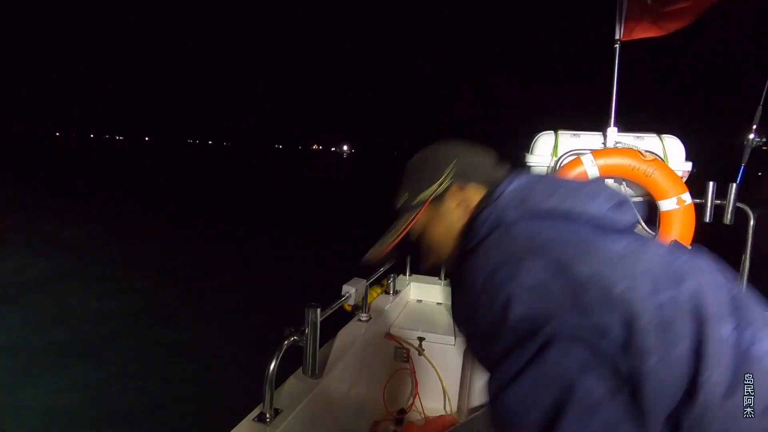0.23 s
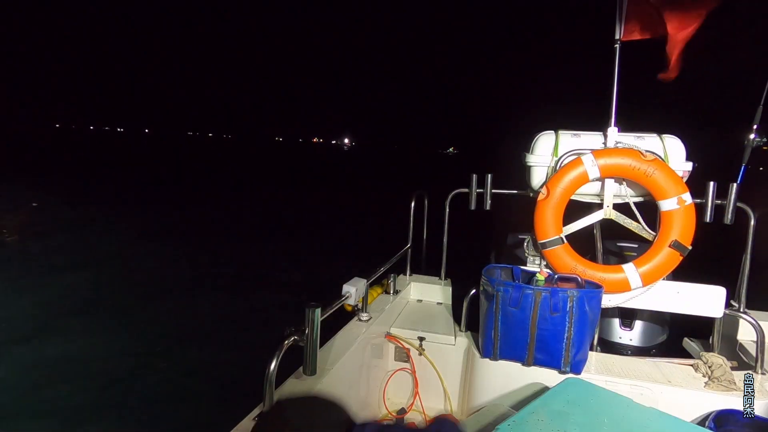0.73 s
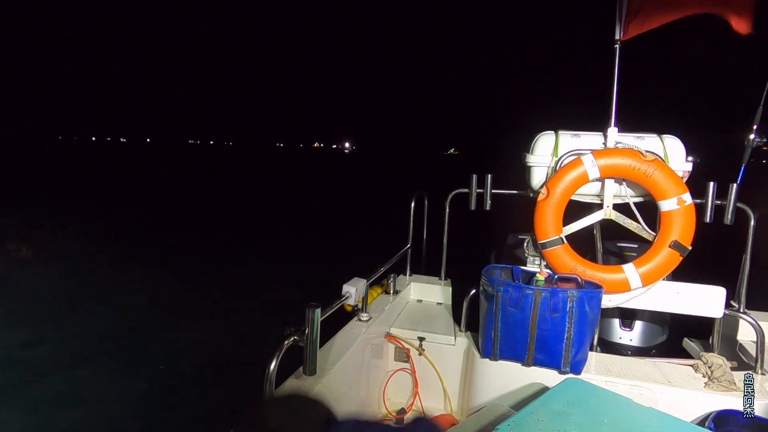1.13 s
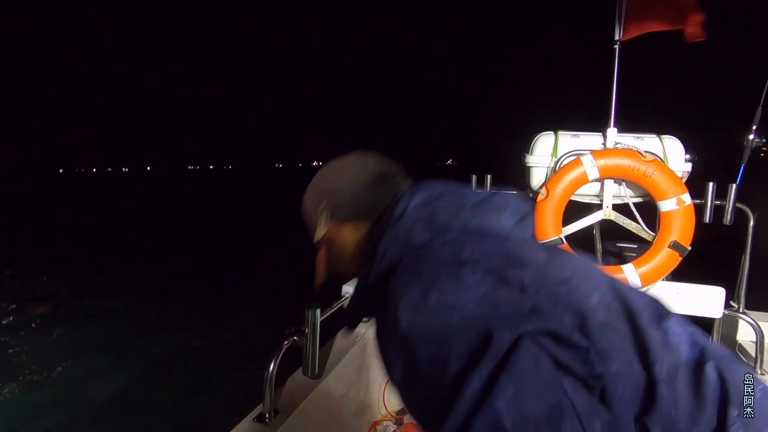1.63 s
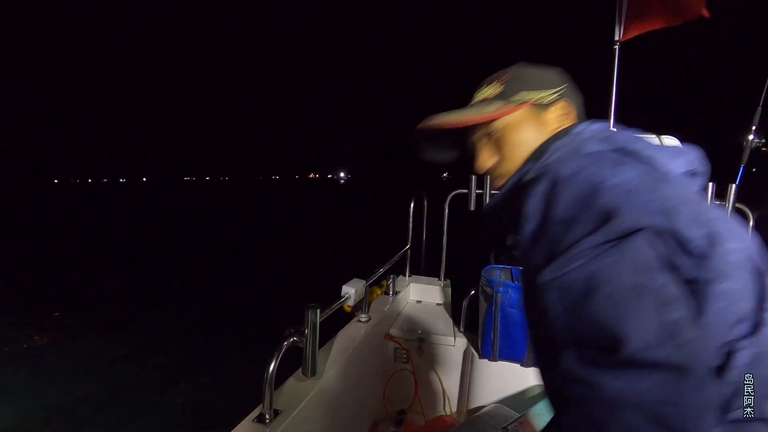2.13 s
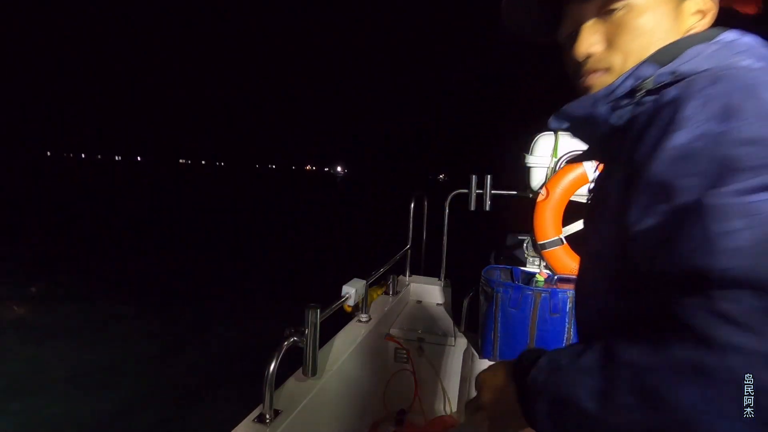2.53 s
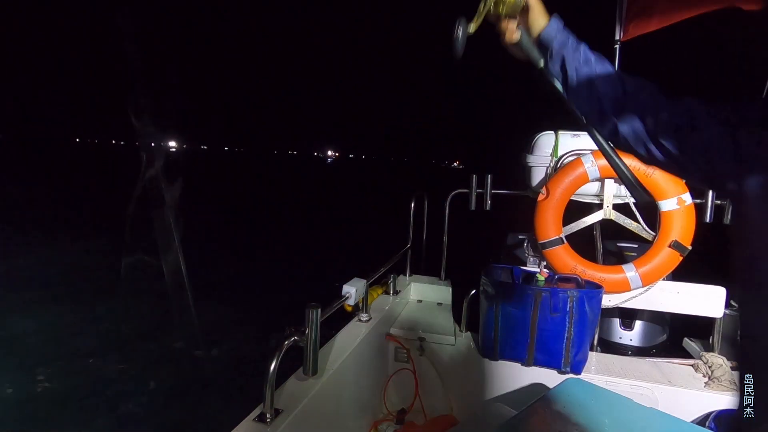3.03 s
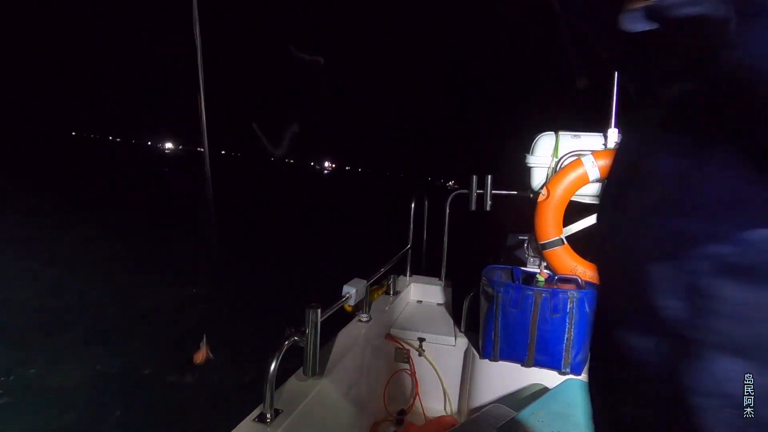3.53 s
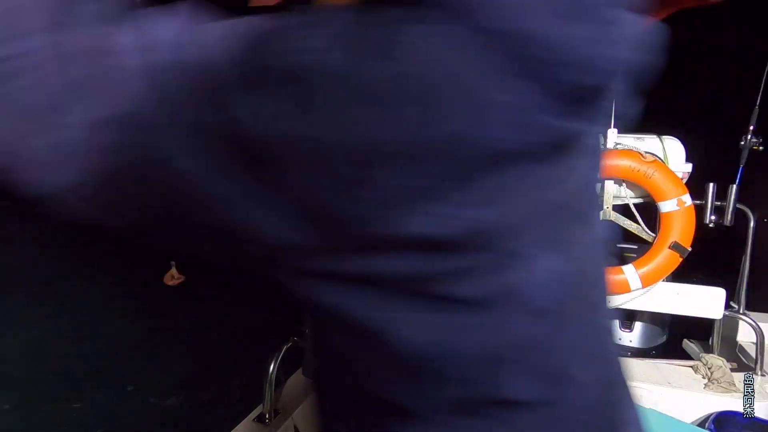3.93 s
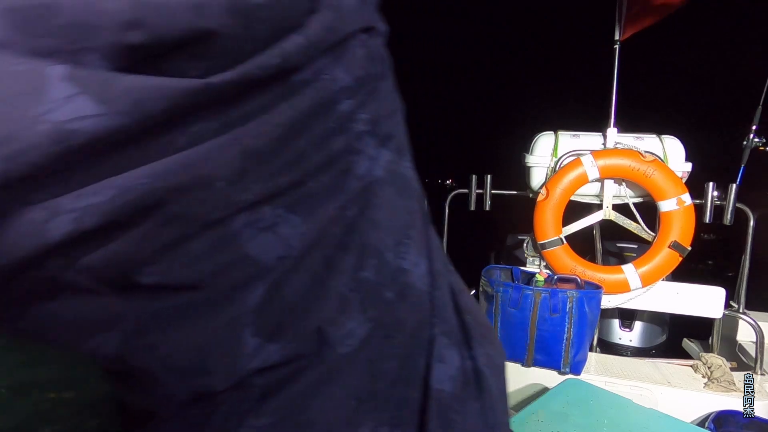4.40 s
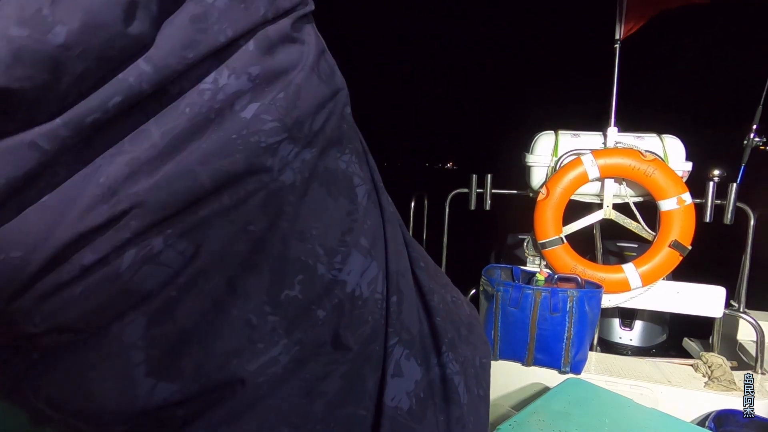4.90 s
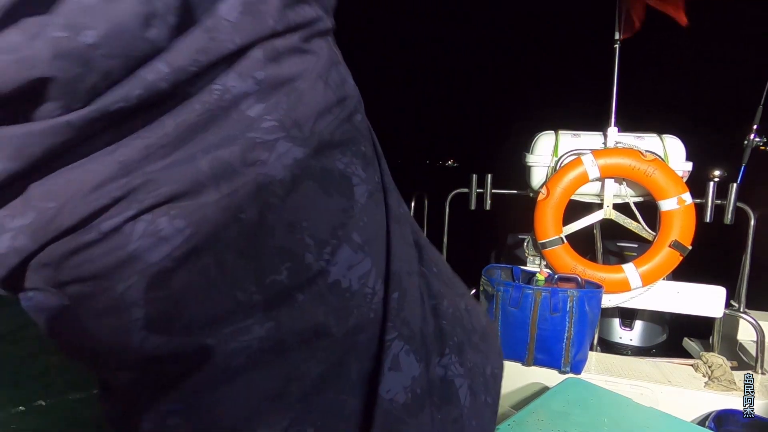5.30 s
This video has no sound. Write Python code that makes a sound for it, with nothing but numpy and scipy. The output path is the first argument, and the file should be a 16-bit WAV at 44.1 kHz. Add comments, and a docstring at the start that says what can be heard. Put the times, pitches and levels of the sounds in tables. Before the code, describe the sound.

Night aboard a small boat: low wind rumble and idling engine, gear clattering on the deck, one violent crack with a boom, then knocks and taps.

```python
"""A small fishing boat at night: wind rumbles on the microphone over an idling engine and the wash of the sea.
An angler's gear clatters on the hollow deck; one hard blow sets the hull booming; sharp knocks, light taps
and the chirr of a reel follow. Impacts are noise bursts and decaying modes shaped by resonant bodies;
wind, water and cloth are shaped noise, the engine a sum of unsteady sines. Gain control ducks loud moments."""
import sys
import numpy as np
from scipy import signal
from scipy.fft import rfft, irfft, next_fast_len
from scipy.io import wavfile
from scipy.ndimage import uniform_filter1d, map_coordinates

SR = 44100
rng = np.random.default_rng(int(sys.argv[2]) if len(sys.argv) > 2 else 0)


def to_wav(s):
    """Save 16-bit WAV."""
    ch = np.atleast_2d(s).T  # columns
    pcm = np.round(np.clip(ch, -1, 1) * 32767)  # PCM
    wavfile.write(sys.argv[1], SR, pcm.astype(np.int16))


N = 244970
TIME = np.arange(N) / SR
HIT = np.arange(16384) / SR  # time within one hit, s
HIT_HZ = np.fft.rfftfreq(len(HIT), 1 / SR)

# Stereo balance: freq_hz, left_minus_right_db
LEFT_BALANCE = [(30, 1), (100, -0.4), (400, 0.6), (1300, 2), (2400, 3.5), (4400, 2), (12000, -1.5)]
# Resonances of the gear: freq_hz, width_hz, prominence (4 units per dB)
GEAR_MODES = [(1110, 200, -6.5), (1850, 270, 2), (2850, 130, 10.5), (3730, 60, -6.5), (4310, 210, -3.5),
              (4900, 140, -5), (7300, 300, -4)]


def amp(db):
    """Decibels to gain."""
    return 10 ** (np.asarray(db) / 20)


def unit(x):
    """x at rms 1."""
    return x / np.sqrt(np.mean(x ** 2) + 1e-20)


def norm(x):
    """x at mean energy 1 per channel."""
    return unit(x) / np.sqrt(x.shape[-1])


def fade(t60_s):
    """Exponential decay over one hit, 60 dB in t60_s."""
    return np.exp(-np.log(1000) * HIT / max(t60_s, 1e-3))


def swell(middle_s, half_s):
    """Bell-shaped rise and fall; 1/e at half_s from the middle."""
    return np.exp(-((TIME - middle_s) / half_s) ** 2)


def along(points, hz):
    """Interpolate (freq_hz, value) points on a log frequency axis."""
    freq_hz, value = np.transpose(points)
    return np.interp(np.log(hz + 1), np.log(freq_hz + 1), value)


def wobble(rate_hz):
    """Smooth random curve with rate_hz knots a second."""
    knots = rng.standard_normal(int(N * rate_hz / SR) + 4)
    return map_coordinates(knots, [TIME * rate_hz])


def filtered(x, response):
    """Multiply the spectrum of x by a response of frequency."""
    size = next_fast_len(N + SR // 2)
    return irfft(rfft(x, size) * response(np.fft.rfftfreq(size, 1 / SR)), size)[..., :N]


def lowpass(x, order, edge_hz):
    """Butterworth low-pass."""
    return signal.sosfilt(signal.butter(order, edge_hz, fs=SR, output="sos"), x)


def add(track, start_s, sound):
    """Mix a sound into a track."""
    part = track[:, round(start_s * SR):][:, :sound.shape[-1]]
    part += sound[..., :part.shape[1]]


def rush(spectrum, patchy_db):
    """Shaped stereo noise, rms 1, with patches of random gain; channel likeness depends on frequency."""
    # Channel correlation: freq_hz, correlation
    likeness = [(25, .6), (45, .85), (70, .95), (130, .99), (280, .97), (640, .72), (1400, .6), (3000, .3),
                (7000, -.1)]
    cells = signal.stft(rng.standard_normal((2, N)), nperseg=512)[2]
    field = rng.standard_normal(cells.shape[1:])
    field = uniform_filter1d(field, size=6, axis=0)
    field = uniform_filter1d(field, size=12, axis=1)
    pair = signal.istft(cells * amp(patchy_db * unit(field)), nperseg=512)[1][:, :N]

    def mid_side(hz):
        turn = np.arccos(np.clip(along(likeness, hz), -1, 1)) / 2
        return amp(along(spectrum, hz)) * [np.cos(turn), np.sin(turn)]

    mid, side = filtered(pair, mid_side)
    balance = lambda hz: amp(np.outer([.5, -.5], along(LEFT_BALANCE, hz)))
    return unit(filtered([mid + side, mid - side], balance))


def pops(spectrum, per_s, spread_db):
    """Sparse shaped stereo pops of uneven size and random place, rms 1."""
    size = amp(spread_db * np.clip(rng.standard_normal(N), -2, 2))
    clicks = (rng.random(N) < per_s / SR) * size * rng.choice([-1, 1], N)
    place = rng.uniform(0, np.pi / 2, N)
    stereo = clicks * [np.cos(place), np.sin(place)]
    balance_db = lambda hz: np.outer([.5, -.5], along(LEFT_BALANCE, hz))
    return unit(filtered(stereo, lambda hz: amp(along(spectrum, hz) + balance_db(hz))))


def through(x, tone, modes=(), lift_db=0):
    """Pass x through a minimum-phase body: a broad tone with resonances standing out of it."""
    db = along(tone, HIT_HZ)
    for hz, width_hz, prominence in modes:
        peak = amp(lift_db + prominence / 4) / (1 + (2 * (HIT_HZ - hz) / width_hz) ** 2)
        db = db + 20 * np.log10(1 + peak)
    # folding the cepstrum makes the response causal
    cepstrum = irfft(np.log(amp(db)))
    cepstrum[1:len(HIT) // 2] *= 2
    cepstrum[len(HIT) // 2:] = 0
    return irfft(rfft(x) * np.exp(rfft(cepstrum)))


def scatter(t60_s, rise_s=0.022):
    """Dense reflections from the boat's walls, energy 1; the side signal lacks bass."""
    mid, side = rng.standard_normal((2, len(HIT))) * fade(t60_s) * (1 - fade(rise_s))
    side = signal.sosfilt(signal.butter(2, 550, "high", fs=SR, output="sos"), side)
    return lowpass(norm(np.array([mid + side, mid - side])), 2, 6500)


def contact(rattle_t60_s, rattle_db, echo_db, echo_t60_s, rise_s=0.0028, hold_s=0):
    """A push, a rattle of tiny rebounds, and duller scatter from the boat's walls."""
    shape = np.interp(HIT - hold_s, HIT, fade(rattle_t60_s)) * (1 - fade(rise_s))
    rattle = norm(rng.choice([-1, 1], len(HIT)) * shape)
    push = (HIT == 0) + amp(rattle_db) * rattle
    return norm(push) + amp(echo_db) * scatter(echo_t60_s)


def voiced(x, low_db, middle_db, high_db):
    """Where and how hard a thing is hit sets the strength of its three registers (rms over 20 ms)."""
    registers = [(700, "low", low_db), ([700, 2500], "band", middle_db), (2500, "high", high_db)]
    out = 0
    for edge_hz, kind, db in registers:
        band = signal.sosfilt(signal.butter(3, edge_hz, kind, fs=SR, output="sos"), x)
        out = out + amp(db) * norm(band)
    return np.sqrt(SR / 50) * out


def ring(modes):
    """Sum of freely decaying modes: freq_hz, level_db, t60_s."""
    return sum(amp(db) * fade(t60_s) * np.sin(2 * np.pi * hz * HIT) for hz, db, t60_s in modes)


def clatter(scrape_db=-12.0, scrape_t60_s=0.084):
    """Gear tumbles on the hollow deck: contacts bite with a gritty scrape, dull ones judder longer, panels ring."""
    # Contacts: start_s, level_db, thud_db (re level)
    contacts = [(2.654, -51.5, 17), (2.678, -29, 8), (2.686, -33.5, 3.5), (2.707, -20, 1),
                (2.714, -28.5, 1.5), (2.752, -30.5, 2), (2.791, -17.5, -8), (2.818, -19.5, -5.5),
                (2.834, -32.5, -0.5), (2.854, -40.5, 12), (2.98, -47.5, 11.5), (3.041, -44, 11),
                (3.06, -37.5, 5)]
    # Resonances of the deck: freq_hz, width_hz, prominence (4 units per dB)
    deck_modes = [(305, 44, 23), (505, 170, -9), (1088, 99, 5), (1490, 170, -2), (1770, 31, -21),
                  (2010, 140, 3), (2520, 90, -16), (2750, 60, -14), (3220, 250, -21), (4560, 120, -30)]
    # Broad tone of the deck: freq_hz, density_db
    deck_tone = [(70, -48), (130, 1), (240, -5.5), (480, -0.5), (680, -1), (850, 2), (1120, 6.5),
                 (1600, -1), (2300, -19), (3300, -20.5), (4800, -49), (8000, -54), (14000, -74)]
    # Tone of the scrape: freq_hz, density_db
    grit_tone = [(300, -6), (1900, 14.5), (2300, 2.5), (3300, 0.5), (4100, -7), (4650, -2.5), (5400, -20.5),
                 (8500, -22), (13000, -51.5)]
    # Deck panels: freq_hz, level_db (re thud, before a 7.5 dB lift), t60_s
    panel_modes = [(225, -13, 0.2), (306.3, -21, 0.97), (481, -10, 0.18), (533, -18.5, 0.088),
                   (652, -20, 0.32), (1048, -19.5, 0.22)]
    judder_t60_s, doubling_db = 0.075, 12.5  # decay at 0 dB thud; rise in thud that doubles it
    out = np.zeros((2, N))
    for s, db, thud_db in contacts:
        judder = contact(judder_t60_s * 2 ** (thud_db / doubling_db), rattle_db=8.5, echo_db=-5.5,
                         echo_t60_s=0.13, rise_s=0.0074, hold_s=0.01)
        body = through(judder, deck_tone, deck_modes, lift_db=6)
        add(out, s, amp(db) * voiced(body, thud_db, 0, -14))
        grains = (rng.random(len(HIT)) < 800 / SR) * rng.choice([-1, 1], len(HIT))  # 800 per s
        grit = grains * fade(scrape_t60_s) + (HIT == 0)
        add(out, s, amp(db + scrape_db) * voiced(through(grit, grit_tone), -27, 0, -4.7))
        # sign and level of each panel mode vary per contact
        panels = sum(rng.choice([-1, 1]) * amp(rng.normal(0, 1.4)) * ring([mode]) for mode in panel_modes)
        add(out, s, amp(db + thud_db + 7.5) * panels)
    return out


def blow(start_s=3.5461, echo_db=6):
    """One hard, dry crack with a weaker rebound and a duller echo; the hull and the deck panels ring."""
    # Tone of the crack: freq_hz, density_db
    crack_tone = [(200, -15.5), (650, -12), (1100, -0.5), (2200, -2.5), (3000, 0.5), (4300, 5.5),
                  (5500, -0.5), (7700, -8.5), (9200, -18), (15000, -19)]
    # The boat's answer: freq_hz, density_db
    echo_tone = [(200, -3.5), (700, -4.5), (1200, 0.5), (2200, -3), (3000, -2), (4500, -6), (6500, -5.5),
                 (8000, -13), (9500, -29.5), (15000, -41)]
    # Hull modes: freq_hz, level_db, t60_s
    hull_modes = [(123, -4.5, 0.37), (168.5, 1.5, 0.097), (234, -18.5, 0.4), (361, -22, 0.17)]
    panel_tone = [(80, -19.5), (250, 15.5), (520, 7.5), (900, 6.0), (4000, -36.0)]
    out = np.zeros((2, N))
    for delay_s, db in [(.0002, 12.3), (.002, 6.2)]:
        crack = contact(0.0029, rattle_db=-4.5, echo_db=-8.5, echo_t60_s=0.11, rise_s=.0007)
        add(out, start_s + delay_s, amp(db) * norm(through(crack, crack_tone, GEAR_MODES, lift_db=-0.5)))
    echo = through(scatter(0.145, rise_s=0.004), echo_tone)
    add(out, start_s, amp(echo_db) * norm(echo))
    unsteady = amp(0.94 * wobble(48)[:len(HIT)])
    add(out, start_s + 0.0065, ring(hull_modes) * (1 - fade(0.046)) * unsteady)
    panels = contact(0.28, rattle_db=32.5, echo_db=-6.5, echo_t60_s=.25)
    add(out, start_s, amp(8.0) * norm(through(panels, panel_tone)))
    return out


def boom(start_s=3.67, level_db=-17, rumble_db=-2, growl_db=-6):
    """After the blow a boom sinks in pitch: a growl first, then a rough, wavering tone in a broad rumble."""
    rise_s, hold_s, release_s = 0.025, 0.155, 0.037
    start_hz, end_hz, sink_s = 204.9, 56.1, 0.0614  # sink_s is the 1/e time
    rumble_spectrum = [(15, -26), (55, 6.5), (130, 7.5), (220, -10), (340, -31), (600, -35), (2000, -75)]
    growl_spectrum = [(30, -13), (70, 8), (150, -3.5), (220, 4.5), (340, -4.5), (450, -21.0), (2000, -69.5)]
    age_s = np.maximum(TIME - start_s, 0)
    hz = end_hz + (start_hz - end_hz) * np.exp(-age_s / sink_s)
    hz = hz * (1 + 0.07 * wobble(60))
    envelope = np.interp(age_s, np.cumsum([0, rise_s, hold_s, release_s]), [0, 1, 1, 0])
    roughness = amp(-2.5 + 3 * wobble(70))
    tone = roughness * envelope * np.sin(2 * np.pi * np.cumsum(hz) / SR)
    rumble = swell(3.73, 0.059) * rush(rumble_spectrum, patchy_db=2.5)
    growl = swell(3.645, 0.061) * rush(growl_spectrum, patchy_db=-4.0)
    return amp(level_db) * (tone + amp(rumble_db) * rumble + amp(growl_db) * growl)


def thumps(rise_s=0.029, t60_s=0.16, rough_db=2):
    """Soft, heavy contacts each wake one low mode of the hull."""
    # Dull thumps: start_s, level_db, pitch_hz
    contacts = [(3.953, -16, 172.3), (4.515, -27, 305), (4.892, -18.5, 187), (4.905, -16, 118)]
    out = np.zeros((2, N))
    for s, db, hz in contacts:
        roughness = amp(rough_db * wobble(74)[:len(HIT)])
        add(out, s, ring([(hz, db, t60_s)]) * (1 - fade(rise_s)) * roughness)
    return out


def knocks(snap_db=-6, metal_s=4.513):
    """Knocks of tackle thud through the hull, each with its own treble edge; a metal fitting rings late on."""
    # Knocks: start_s, level_db, thud_db (re level), treble_db (re level), rattle_t60_s, treble_edge_hz
    hits = [(3.95, -28.5, 1, -11, 0.065, 3500), (4.08, -15.5, -10, -8, 0.12, 12000),
            (4.3, -27.5, -4.5, -7, 0.13, 3400), (4.511, -28.5, -7, 2, 0.06, 9000),
            (4.517, -29, 0, -5, 0.091, 9000), (4.526, -32.5, -0.5, -6, 0.056, 4500)]
    # Tone of a knock: freq_hz, density_db
    knock_tone = [(100, 6.5), (330, 8.5), (700, 0), (1200, 4.5), (2000, 1.5), (2800, -10.5), (3600, -15.5),
                  (5500, -18), (7700, -24.5), (9200, -40), (12500, -49), (14000, -74.5)]
    # Hull modes: freq_hz, level_db (re thud), t60_s
    thud_modes = [(121.2, 0.5, 0.5), (164, -4.5, 0.35), (194.5, -7, 0.18), (228.3, -7.5, 0.61),
                  (277, -5.5, 0.22)]
    # Metal fitting: freq_hz, level_db, t60_s
    metal_modes = [(902, -31, 0.14), (1210, -25.5, 0.14), (1730, -35, 0.1), (1970, -35, 0.11),
                   (1980, -24, 0.06), (2400, -25, 0.08), (2800, -17, 0.034), (3580, -33, 0.1),
                   (4200, -41, 0.049), (5990, -33, 0.087), (11360, -55, 0.073), (12300, -55, .05)]
    out = np.zeros((2, N))
    for s, db, thud_db, treble_db, rattle_t60_s, edge_hz in hits:
        hit = contact(rattle_t60_s, rattle_db=10.5, echo_db=-2.5, echo_t60_s=0.093, rise_s=0.0008)
        snap = contact(0.0098, rattle_db=7.5, echo_db=-17, echo_t60_s=0.03, rise_s=0.0005)
        hit = lowpass(hit + amp(snap_db) * snap, 4, edge_hz)
        body = through(hit, knock_tone, GEAR_MODES, lift_db=-14.0)
        add(out, s, amp(db) * voiced(body, thud_db, 0, treble_db))
        add(out, s + 0.003, amp(db + thud_db) * ring(thud_modes))
    add(out, metal_s, ring(metal_modes) * (1 - fade(0.0025)))
    return out


def taps(click_db=12.5):
    """Light hollow taps: a dull click and two resonances that die within milliseconds, answered by a near wall."""
    # Taps: start_s, level_db, lower_hz, upper_hz, upper_db (re level); fixed lifts follow
    hits = [(2.076, -29, 1070, 2200, -21), (4.688, -12.5, 1560, 2520, -24), (4.796, -15, 1320, 2520, -12.5),
            (4.861, -20, 1250, 2850, -7), (4.913, -15.5, 1270, 2750, -16.5)]
    # Lingering ring: freq_hz, level_db (re tap), t60_s
    tail_modes = [(1284, -22.5, 0.18), (1980, -37, 0.09)]
    click_tone = [(200, 6), (600, 10), (850, 2.5), (1300, 9.5), (2000, 8.5), (2900, -3),
                  (3800, -13.0), (7000, -21.0), (10000, -50.0)]
    out = np.zeros((2, N))
    for s, db, lower_hz, upper_hz, upper_db in hits:
        body = ring([(lower_hz, db + 6.0, .015), (upper_hz, db + upper_db + 11.5, .011)])
        body = body * (1 - fade(0.0023))
        push = contact(0.058, rattle_db=-11, echo_db=-9.5, echo_t60_s=0.076)
        add(out, s, signal.fftconvolve(push, body[None], axes=1))
        add(out, s + 0.012, amp(-22.0) * body)  # near wall
        add(out, s, amp(db) * ring(tail_modes))
        click = contact(0.06, rattle_db=22.0, echo_db=-2.5, echo_t60_s=0.11)
        add(out, s, amp(db + click_db) * norm(through(click, click_tone)))
    return out


def reel(width_hz=110, upper_db=-4, teeth_per_s=420, spread_db=3):
    """The reel chirrs in short turns: teeth rattle two resonances that shift with the load on the line."""
    # Turns: middle_s, half_length_s, level_db, lower_hz, upper_hz
    turns = [(4.484, 0.025, -43, 1200, 1850), (4.654, 0.032, -49, 1070, 1800),
             (4.745, 0.037, -50, 934, 1700), (4.831, 0.03, -52, 1080, 1830),
             (4.959, 0.031, -43.5, 1010, 1700), (5.045, 0.023, -43, 1000, 1710),
             (5.113, 0.022, -42, 1010, 1750), (5.275, 0.018, -40, 1070, 1760)]
    out = np.zeros((2, N))
    for s, half_s, db, lower_hz, upper_hz in turns:
        teeth = (rng.random(len(HIT)) < teeth_per_s / SR) * amp(spread_db * rng.standard_normal(len(HIT)))
        band = lambda hz: unit(irfft(rfft(teeth) / (1 + 1j * (HIT_HZ - hz) / width_hz) ** 2))
        stroke = np.exp(-(HIT / half_s - 2) ** 2)  # peaks at 2 * half_s
        chirr = norm(stroke * (band(lower_hz) + amp(upper_db) * band(upper_hz))) * np.linalg.norm(stroke)
        add(out, s - 2 * half_s, amp(db) * chirr)
    return out


def ticks(clink_s=1.216, bounce_s=0.019, clink_click_db=-49):
    """Faint clicks of tackle, each with a bright snap, and a small metal clink that strikes twice."""
    # Clicks: start_s, level_db, treble_db (re level), snap_db (re level)
    clicks = [(0.244, -48.5, -14, -25), (0.339, -38, -14, -33), (0.387, -44.5, -12, -22),
              (0.396, -40, -11, -26.5), (0.919, -39, -21, -33), (0.994, -40.5, -3, -30),
              (1.03, -45.5, -7, -13.5), (1.475, -46, -1.5, -32), (2.074, -45, -9, -6.5),
              (3.392, -44.5, -12, -23), (3.457, -47.5, 0.5, -22.5), (4.256, -46.5, -8, -24),
              (4.352, -43.5, -7, -24)]
    # Tone of a click: freq_hz, density_db
    tick_tone = [(150, -4), (900, 6.5), (2600, -6.5), (5000, -17.5), (7800, -30), (9500, -43),
                 (14000, -49.5)]
    # Clink: freq_hz, level_db, t60_s
    clink_modes = [(3300, -40, .04), (3600, -39, 0.035), (5050, -35.5, 0.032), (5300, -45, 0.037),
                   (7400, -50, .03), (12500, -57, .02)]
    thud_db = -9.5  # re level
    out = np.zeros((2, N))
    tick = lambda: through(contact(0.028, rattle_db=6.5, echo_db=-3.0, echo_t60_s=0.09), tick_tone)
    for s, db, treble_db, snap_db in clicks:
        add(out, s, amp(db) * voiced(tick(), thud_db, 0, treble_db))
        snap = contact(0.034, rattle_db=9, echo_db=5, echo_t60_s=0.06)
        add(out, s, amp(db + snap_db) * voiced(snap, -19, -11, 0))
    clink = ring(clink_modes) * (1 - fade(0.0023))
    add(out, clink_s, clink + amp(clink_click_db) * voiced(tick(), thud_db, 0, 1.8))
    add(out, clink_s + bounce_s, amp(-4.0) * clink)
    return out


def jacket(flutter_db=0.5):
    """Stiff cloth rubs in fluttering strokes as the angler moves; folds that buckle add rough crinkles."""
    # Strokes: middle_s, half_length_s, level_db, crinkle_db (re level)
    strokes = [(0.261, 0.042, -38, -10.5), (0.398, 0.04, -42, -3.5), (0.904, 0.053, -38, -4.5),
               (1.004, 0.023, -44.5, 2), (2.393, 0.056, -40.5, -3.5), (3.209, 0.016, -39, -3),
               (3.5, 0.11, -43.5, -1), (4.78, 0.21, -38, -4), (5.013, 0.033, -35, -13),
               (5.088, 0.051, -46, -6.5)]
    # Rubbing cloth: freq_hz, density_db
    cloth_spectrum = [(150, 2.5), (350, 9.5), (700, -1.5), (1200, -5), (2000, -12.5), (3500, -30.5),
                      (7000, -30), (12000, -51.5)]
    # Buckling folds: freq_hz, density_db
    crinkle_spectrum = [(200, -7.5), (540, 7.5), (800, 0.5), (1400, -1.5), (2200, -10), (4500, -18),
                        (8000, -31), (12000, -45.5)]
    rub = sum(amp(db) * swell(s, half_s) for s, half_s, db, _ in strokes)
    buckle = sum(amp(db + crinkle_db) * swell(s, half_s) for s, half_s, db, crinkle_db in strokes)
    cloth = unit(amp(flutter_db * wobble(110)) * rush(cloth_spectrum, patchy_db=1.0))
    return rub * cloth + buckle * pops(crinkle_spectrum, per_s=260, spread_db=4.0)


def wind(split_hz=115, flutter_db=2, lumps_db=2.5):
    """Large eddies buffet the microphone in lumps that follow the gusts; smaller ones add a fluttering rumble."""
    # Wind noise: freq_hz, density_db
    wind_spectrum = [(10, -25.5), (20, -12.5), (28, -5.5), (38, 5), (52, -5), (72, 2.5), (115, -3.5),
                     (150, -6.5), (200, -9), (260, -10.5), (340, -14), (420, -18.5), (560, -27), (900, -50),
                     (2000, -76)]
    # Gusts and lulls: time_s, level_db (before deep_db)
    gusts = [(0.0, -35), (0.06, -30.5), (0.14, -36.5), (0.64, -39), (0.69, -33), (0.75, -39.5),
             (1.52, -32.5), (1.67, -35), (2.28, -30), (2.31, -39), (2.47, -30), (2.96, -40), (3.05, -33),
             (3.19, -38), (3.86, -28.5), (3.89, -36), (4.75, -34), (4.81, -43), (4.93, -32.5), (5.01, -40),
             (5.19, -33.5), (5.5, -32.5)]
    deep_db, rumble_db = 2, -37
    gust_share = 0.2  # share of a gust's dB swing that the rumble follows
    gust_db = np.interp(TIME, *np.transpose(gusts))
    air = rush(wind_spectrum, patchy_db=0.5)
    deep = filtered(air, lambda hz: 1 / (1 + (hz / split_hz) ** 8))
    rumble = unit(amp(flutter_db * wobble(32)) * (air - deep))
    buffet = unit(amp(lumps_db * wobble(10)) * deep)
    rumble_gain = amp(rumble_db + gust_share * (gust_db - gust_db.mean()))
    return amp(deep_db + gust_db) * buffet + rumble_gain * rumble


def engine(firing_hz=33.68, drift=0.02502, rough_db=2.5):
    """The idling engine throbs under the deck: harmonics of the firing rate, each unsteady."""
    # Engine orders 1, 2, 3, ..: level_db (rms)
    order_levels = [-55, -43, -44, -47.5, -53, -50, -52.5, -52]
    turns = np.cumsum(firing_hz * (1 + drift * wobble(2))) / SR
    out = 0
    for k, db in enumerate(order_levels, 1):
        phase = 2 * np.pi * (k * turns + rng.random()) + 0.45 * wobble(5.01)
        out = out + amp(db + rough_db * wobble(5.6)) * np.sin(phase)
    return np.sqrt(2) * out


def slaps(half_s=0.026, waver=0.045):
    """A wave against the hull gives one short, round, low puff; a longer one sloshes hollowly beneath it."""
    # Slaps: middle_s, pitch_hz, peak_db
    puffs = [(0.41, 94.2, -24.5), (0.69, 68, -23.5), (0.88, 68, -26), (2.0, 66.8, -26), (2.55, 66.6, -25.5),
             (4.555, 67, -30.5), (5.35, 80, -36)]
    # Water under the hull: freq_hz, density_db
    slosh_spectrum = [(100, -29), (190, -0.5), (270, 4.5), (480, -6.5), (800, -17), (2000, -50)]
    slosh_gain = amp(-42 + 1.5 * wobble(20)) * swell(1.1, 0.32)
    out = slosh_gain * rush(slosh_spectrum, patchy_db=0.5)
    for s, hz, db in puffs:
        phase = 2 * np.pi * np.cumsum(hz * (1 + waver * wobble(40))) / SR
        out = out + amp(db) * swell(s, half_s) * np.sin(phase)
    return out


def sea(drops_db=-7):
    """Waves swell and drain over a calm wash: water laps and spatters under hissing spray; crests fizz."""
    # Waves along the hull: crest_s, rise_s, water_db, spray_db (before a 4.5 dB lift), fizz_db
    waves = [(0.38, 0.11, -44, -53.5, -63), (0.6, 0.087, -50, -57, -63), (1.4, 0.2, -44.5, -56.5, -90),
             (1.86, 0.14, -47.5, -55, -92), (4.68, 0.48, -47, -62.5, -88)]
    # Lapping water: freq_hz, density_db
    water_spectrum = [(260, -29), (450, -4.5), (573, -5.5), (715, -3), (832, -8), (1030, -5), (1790, -9.5),
                      (3410, -16), (5000, -31.5), (6500, -60), (11000, -120)]
    # Spray: freq_hz, density_db
    spray_spectrum = [(2350, -11.5), (3300, -4.5), (4000, -2.5), (4700, -5), (5420, -7.5), (7600, -14.5),
                      (9070, -26), (12200, -31.5), (15000, -48.5)]
    # Bursting foam: freq_hz, density_db
    fizz_spectrum = [(4000, -23), (6500, -1), (8500, -4.5), (12000, -12), (15000, -24.5)]
    drain_s = 0.41  # 1/e run-off time
    # wash between waves; powers add
    water_power, spray_power, foam = amp(-47.5) ** 2, amp(-62) ** 2, 0
    for s, rise_s, water_db, spray_db, fizz_db in waves:
        surge = np.where(TIME < s, swell(s, rise_s), np.exp(-np.abs(TIME - s) / drain_s))
        water_power = water_power + (amp(water_db) * surge) ** 2
        spray_power = spray_power + (amp(spray_db) * surge) ** 2
        foam = foam + amp(fizz_db) * surge ** 2
    drops = pops(water_spectrum, per_s=260, spread_db=5.0)
    water = amp(0.67 * wobble(25.6)) * (rush(water_spectrum, patchy_db=2.5) + amp(drops_db) * drops)
    spray = amp(4.5 + 1.0 * wobble(30)) * rush(spray_spectrum, patchy_db=0.5)
    fizz = rush(fizz_spectrum, patchy_db=0.0)
    return np.sqrt(water_power) * water + np.sqrt(spray_power) * spray + foam * fizz


def gain_control(x, threshold_db=-13.5, recovery_db_per_s=6.5):
    """Whatever passes the rms threshold pulls the gain down within milliseconds; it then creeps back."""
    window = np.ones(SR // 200) / (SR // 200)  # 5 ms
    smooth = lambda v: np.convolve(v, window)[:N]
    level_db = 10 * np.log10(smooth(np.mean(x ** 2, axis=0)) + 1e-12)
    over_db = np.maximum(level_db - threshold_db, 0)
    recovered_db = recovery_db_per_s * TIME
    # peak hold that falls at the recovery rate
    cut_db = np.maximum.accumulate(over_db + recovered_db) - recovered_db
    return x * amp(-smooth(cut_db))


def right_first(x, lag_s):
    """Delay the left channel by lag_s against the right."""
    return filtered(x, lambda hz: np.exp(1j * np.pi * lag_s * np.outer([-1, 1], hz)))


def scene(lag_s=2.6e-5, bed_lag_s=6e-5):
    """Gear is a little louder on the left; all sounds reach the right port a moment sooner."""
    leftward = lambda x, db: x * amp([[db], [-db]])
    gear = leftward(clatter() + blow() + boom() + thumps(), .5)
    gear = gear + leftward(knocks() + ticks(), 1.1) + leftward(taps() + reel(), 1.9)
    bed = wind() + engine() + slaps() + sea()
    return right_first(gear + jacket(), lag_s) + right_first(bed, bed_lag_s)


def record(dry, top=1.0, band_limit_hz=15300):
    """The recorder rides its gain, rounds off peaks near full scale and keeps nothing above its band limit."""
    x = gain_control(dry)
    rounded = x / (1 + (x / top) ** 6) ** (1 / 6)
    return filtered(rounded, lambda hz: hz < band_limit_hz)


dry = scene()
out = record(dry)
to_wav(out)
```